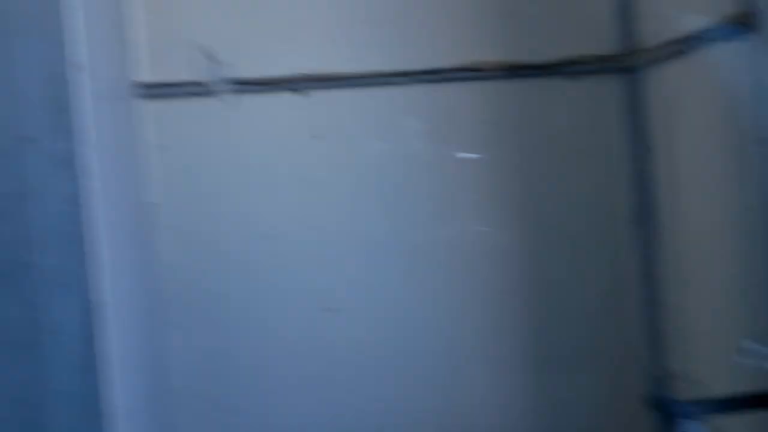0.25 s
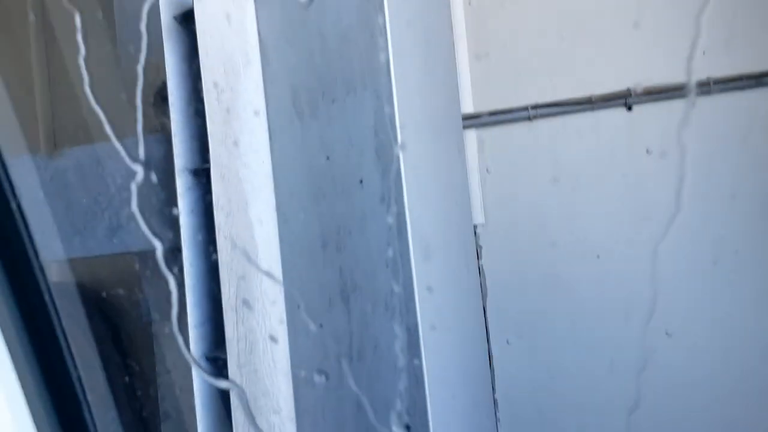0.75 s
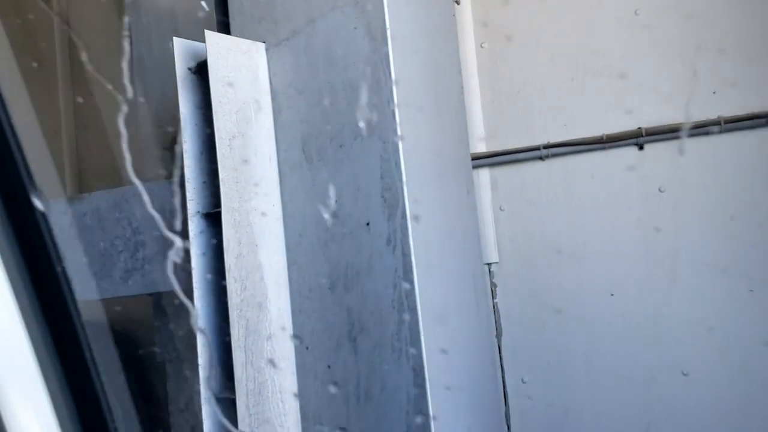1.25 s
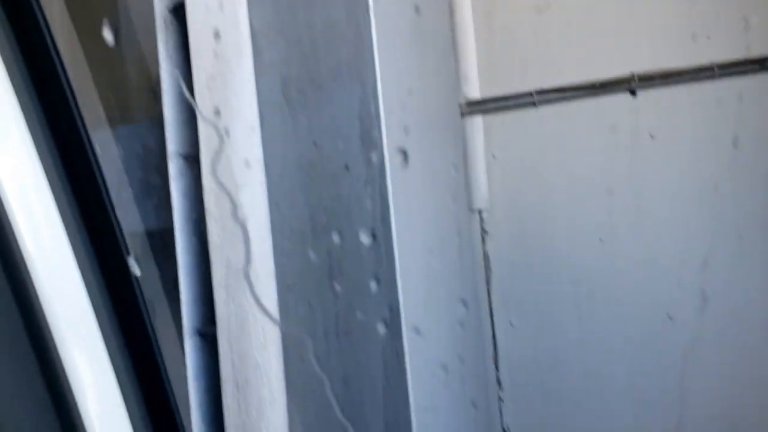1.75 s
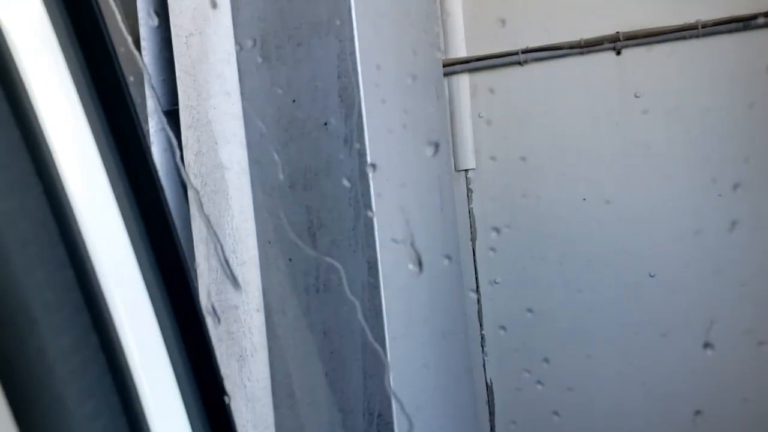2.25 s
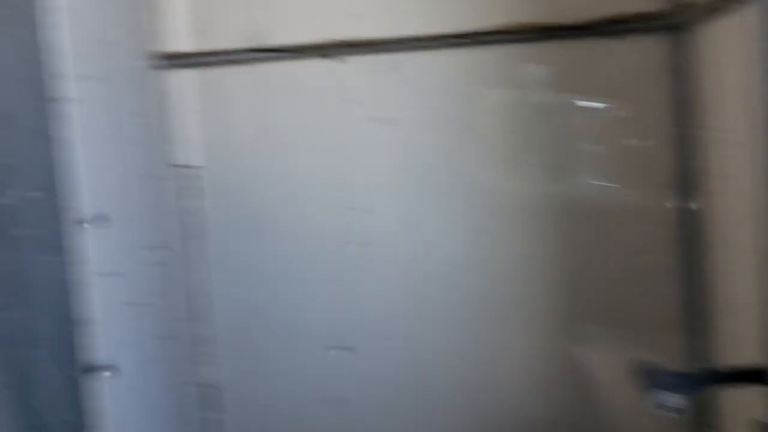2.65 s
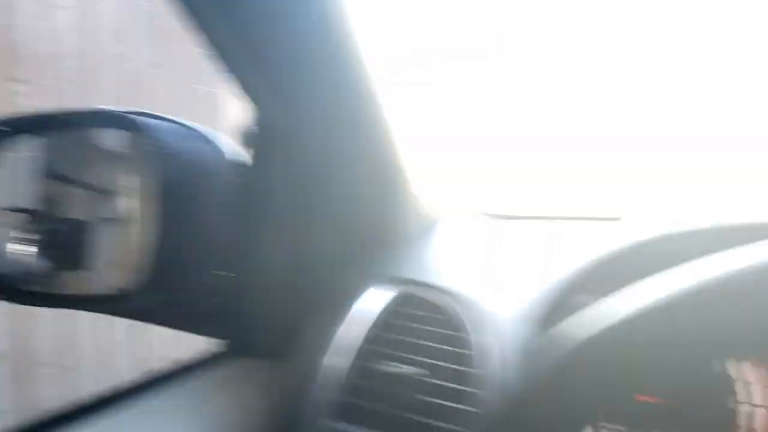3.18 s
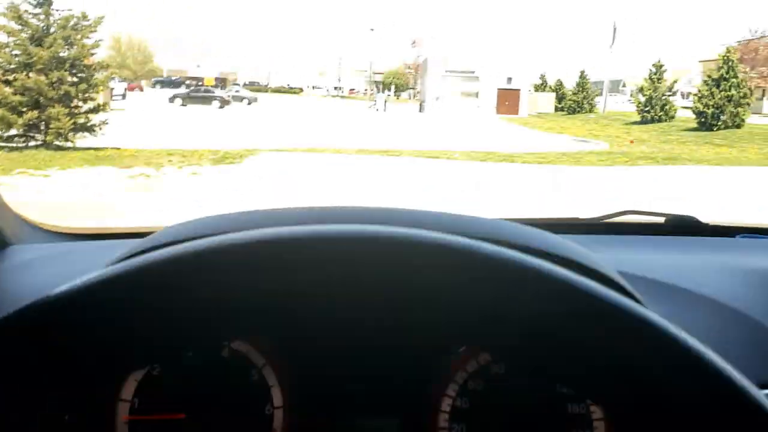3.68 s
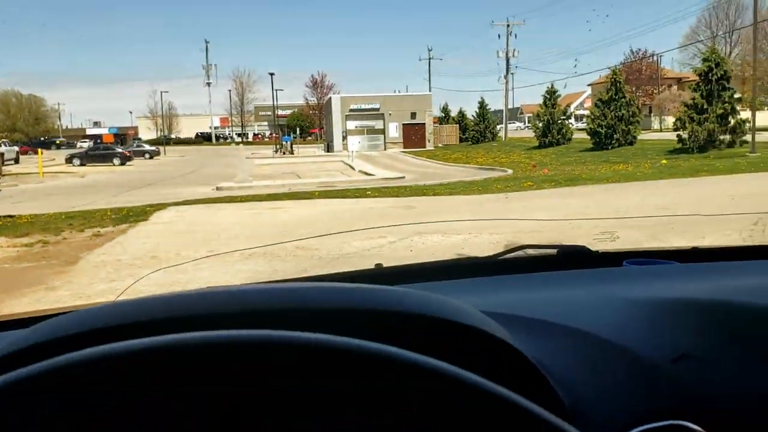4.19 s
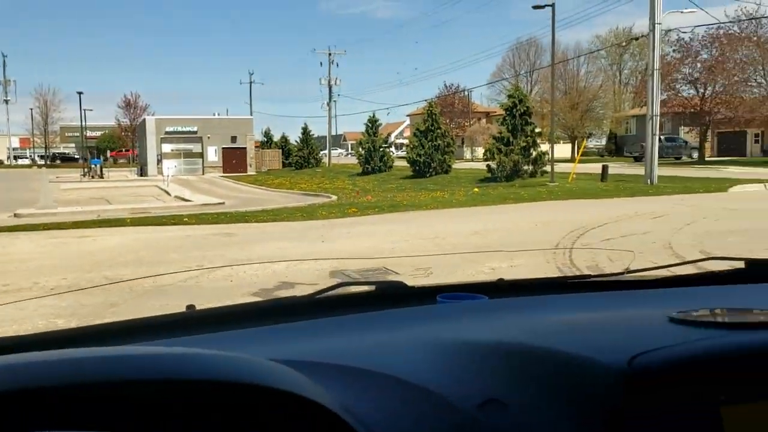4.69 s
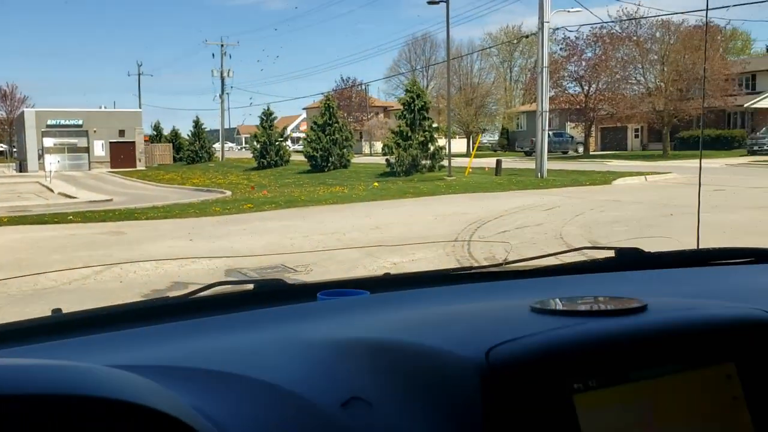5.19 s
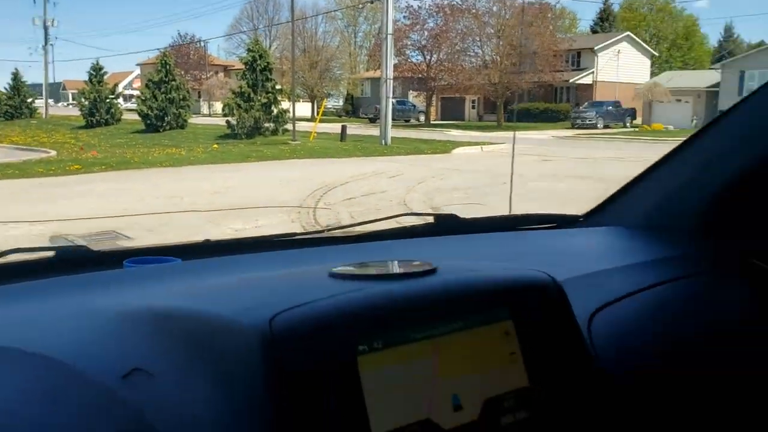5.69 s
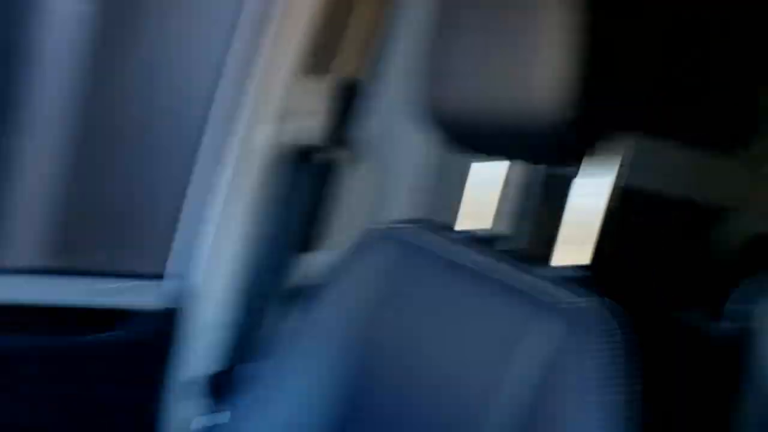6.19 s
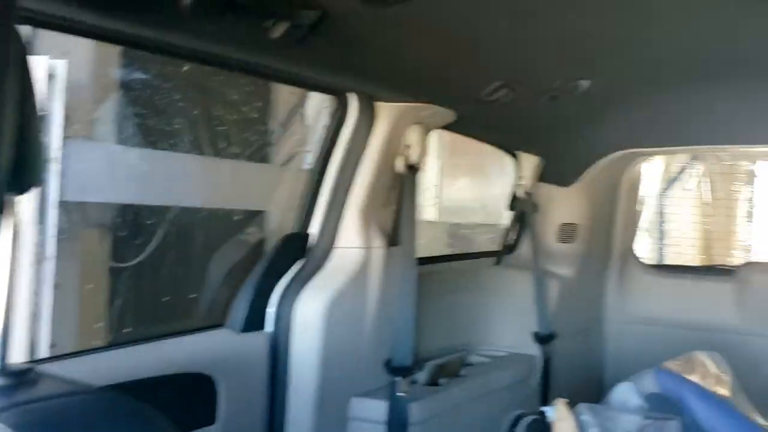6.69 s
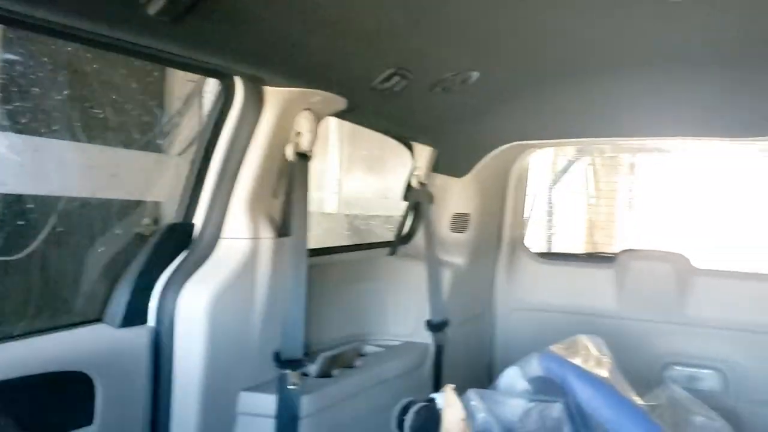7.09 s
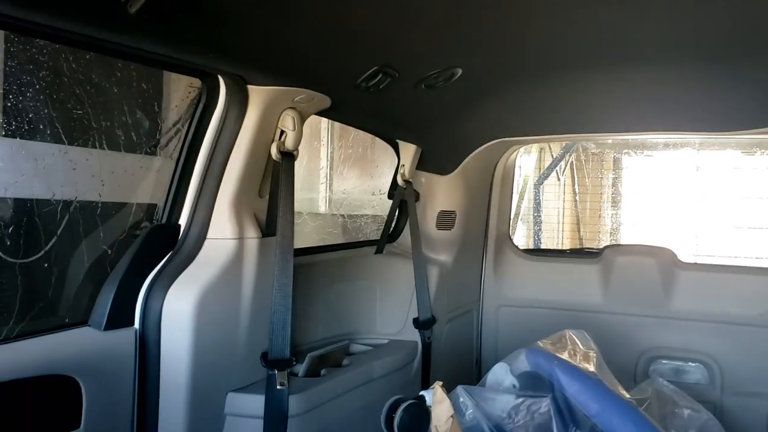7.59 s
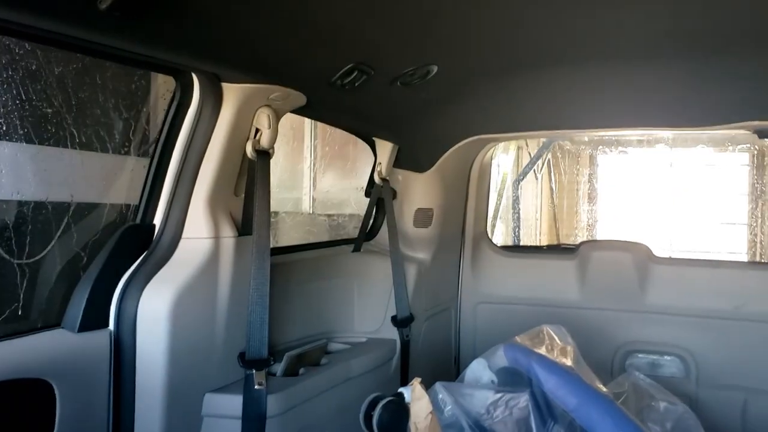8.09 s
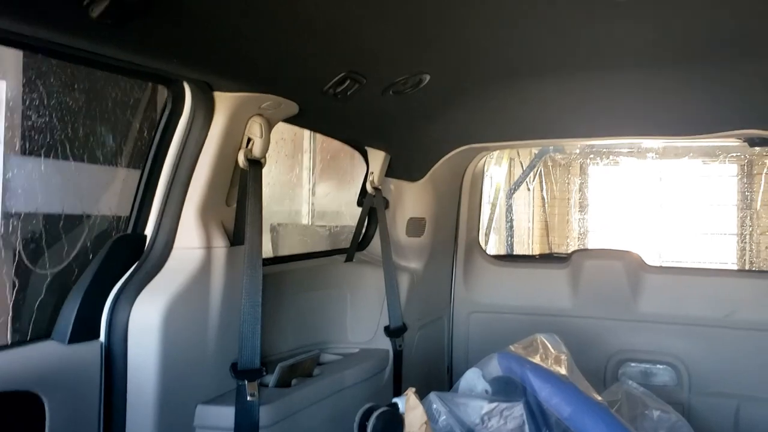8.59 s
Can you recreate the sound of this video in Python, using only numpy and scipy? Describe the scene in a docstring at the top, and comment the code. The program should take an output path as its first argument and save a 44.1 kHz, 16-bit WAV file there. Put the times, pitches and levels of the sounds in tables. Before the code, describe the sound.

Inside a van rolling slowly out of a car wash, large dryer blowers roar, dulled by the glass. A deep hum and boom fill the cabin, wavering and buffeting, with soft air hiss at the windows strongest early. Clothes rustle close to the handheld microphone as the person turns around three and six seconds, followed by faint ticks and crackles.

```python
"""Dryer blowers roar over a van rolling out of a car wash: filtered noise, muffled by the glass.
Their jets drum on shell, roof and doors: noise in steep resonances, following level curves and jet travel.
The cabin booms and hums (narrow noise, the hum around a wandering tone); air hisses at the windows.
The person holding the phone turns twice; clothes rustle, swish and crackle (shaped noise, tiny rings).
Noise-burst ticks and thin sine squeaks sound close by."""
import sys
import numpy as np
from scipy import signal
from scipy.fft import rfft, irfft, next_fast_len
from scipy.io import wavfile
from scipy.ndimage import uniform_filter1d, map_coordinates

SR = 44100
rng = np.random.default_rng(int(sys.argv[2]) if len(sys.argv) > 2 else 0)


def generate_wav(signal):
    """Clip the signal to [-1, 1] and save it as 16-bit WAV at the path in sys.argv[1]."""
    frames = np.transpose(np.atleast_2d(signal))
    scaled = np.clip(frames, -1, 1) * 32767
    pcm = np.round(scaled).astype(np.int16)
    wavfile.write(sys.argv[1], SR, pcm)


N = 390285


def amp(db):
    """Decibels to gain."""
    return 10 ** (np.asarray(db) / 20)


def unit(x):
    """Scale a stereo pair so that its mid signal has rms 1."""
    return x / np.sqrt(np.mean(x.mean(0) ** 2) + 1e-20)


def along(points, hz):
    """Interpolate (f/Hz, value) points on a log frequency axis."""
    f, v = np.transpose(points)
    return np.interp(np.log(hz + 1), np.log(f + 1), v)


def curves(rows):
    """One value per sample for each column after the time."""
    s, *cols = np.transpose(rows)
    return [np.interp(np.arange(N) / SR, s, c) for c in cols]


def wobble(rate_hz):
    """Smooth random curve with rate_hz knots a second."""
    knots = rng.standard_normal(int(N * rate_hz / SR) + 4)
    return map_coordinates(knots, [np.arange(N) * rate_hz / SR])


def ramp(start_s, length_s):
    """Linear rise from 0 to 1."""
    return np.clip((np.arange(N) / SR - start_s) / length_s, 0, 1)


def bump(middle_s, half_s):
    """Gaussian swell from 0 to 1 and back."""
    return np.exp(-((np.arange(N) / SR - middle_s) / half_s) ** 2)


def filtered(x, response):
    """Multiply the spectrum of x by response(hz)."""
    m = next_fast_len(N + SR // 2)
    return irfft(rfft(x, m) * response(np.fft.rfftfreq(m, 1 / SR)), m)[..., :N]


def panned(side_db):
    """Left and right gains of mean power 1 for a left-right level difference."""
    pair = amp(np.atleast_1d(side_db) * np.array([[1], [-1]]) / 2)
    return pair / np.sqrt(np.mean(pair ** 2, axis=0))


# left-right likeness before the lag: f/Hz, coherence
COHERENCE = [(40, 1), (170, 0.92), (350, 1), (480, 0.69), (620, .48), (850, .1), (1200, -.2), (2200, 0),
             (16000, -0.0024)]


def turbulence(colour, lag_s=0.00041):
    """Coloured noise, mid rms 1: ports alike in the bass, where the left leads by lag_s."""
    def mid_side_gains(hz):
        turn = np.arccos(np.clip(along(COHERENCE, hz), -1, 1)) / 2
        return np.array([np.cos(turn), np.sin(turn)])

    def lead(hz):
        lag = lag_s / (1 + (hz / 500) ** 2)
        return np.exp(1j * np.pi * hz * lag * np.array([[1], [-1]]))

    mid, side = filtered(rng.standard_normal((2, N)), mid_side_gains)
    ports = np.array([mid + side, mid - side])
    return unit(filtered(ports, lambda hz: colour(hz) * lead(hz)))


def drumming(modes, steady):
    """Noise through steep resonances; steady (0-1) evens out the power over 0.1 s."""
    def colour(hz):
        power = 0
        for centre_hz, width_hz, db in modes:
            detuning = (hz ** 2 - centre_hz ** 2) / (width_hz * (hz + 1))
            power = power + amp(db) ** 2 / (1 + detuning ** 2 / 2) ** 3
        return np.sqrt(power)

    x = turbulence(colour)
    power = np.abs(uniform_filter1d(x.mean(0) ** 2, size=SR // 10)) + 1e-6
    return unit(x / power ** (np.clip(steady, 0, 1) / 2))


def cored(hz, width_hz, core, steady):
    """Narrow resonance around a wandering tone that holds the share core (0-1) of its power."""
    tone = np.sqrt(2) * np.sin(2 * np.pi * np.cumsum(hz + width_hz / 4 * wobble(20)) / SR)
    return np.sqrt(1 - core) * drumming([(hz, width_hz, 0)], steady) + np.sqrt(core) * tone


TO_WINDSCREEN_S, QUICK_TURN_S = 3.12, 0.59  # turn from side window to windscreen: middle, length
TO_REAR_S, SLOW_TURN_S = 5.83, 1.1  # turn on to the rear seats: middle, length


def heading():
    """How far the phone faces the windscreen, and how far the rear seats (each 0-1)."""
    first = ramp(TO_WINDSCREEN_S - QUICK_TURN_S / 2, QUICK_TURN_S)
    second = ramp(TO_REAR_S - SLOW_TURN_S / 2, SLOW_TURN_S)
    return first - second, second


# base left-right level of the low sound, and its change in each direction
SIDE_DB, WINDSCREEN_SIDE_DB, REAR_SIDE_DB = 3, 1, -0.9


def facing_db():
    """Left-right level of the low sound as the phone turns."""
    to_windscreen, to_rear = heading()
    return SIDE_DB + WINDSCREEN_SIDE_DB * to_windscreen + REAR_SIDE_DB * to_rear


FADE_SHAPE = 1.3  # exponent above 1: the front jets linger before they fade
REAR_FULL_S = 8.5  # rear jets at full gain from here on


def driven(drive):
    """A part's gain as the jets travel front to rear and the phone moves through standing waves."""
    level_db, front_db, fade_s, rear_db, felt_s, windscreen_db = drive
    front_jets = np.exp(-(np.arange(N) / SR / fade_s) ** FADE_SHAPE)
    rear_jets = ramp(felt_s, REAR_FULL_S - felt_s)
    jets_db = front_db * front_jets + rear_db * rear_jets
    return amp(level_db + jets_db + windscreen_db * heading()[0])


BUFFET_DB = 1.3  # scale of the random swing of the jets' push


def buffeted(drive):
    """A driven gain with a random swing."""
    return driven(drive) * amp(BUFFET_DB * wobble(8))


def reflections(x, depth_db=1.0):
    """Window reflections: random, drifting ripples in the spectrum at each port."""
    z = signal.stft(x, nperseg=2048)[2]
    ripple = uniform_filter1d(rng.standard_normal(z.shape), size=3, axis=1)
    ripple = uniform_filter1d(ripple, size=36, axis=2)
    return signal.istft(z * amp(depth_db * ripple / ripple.std()), nperseg=2048)[1][:, :N]


# right port is weak in a band of the treble: f/Hz, left-right level/dB
PORT_SIDE = [(3000, 8), (5000, 10.5), (5800, 19.5), (7900, 19.5), (9300, -0.5), (11500, -2), (14500, 6)]


def close_by(x, spectrum):
    """Colour a sound made right beside the microphone ports."""
    return filtered(x, lambda hz: amp(along(spectrum, hz)) * panned(along(PORT_SIDE, hz)))


# body shell resonances: f/Hz, width/Hz, relative level/dB
SHELL_MODES = [(39, 22, -0.5), (53, 17, 0.5)]
# gusts on the shell: t/s, half length/s, gain/dB
GUSTS = [(0.35, 0.15, 3.5), (1.95, 0.27, 2.5), (4.75, 0.14, 7), (5.3, 0.31, 4), (6.348, 0.27, 5.5),
         (8.33, 0.18, 6.5)]
SHUDDER_DB = -33  # between gusts


def shudder():
    """Body shell: deep resonances, louder in gusts."""
    gust_db = sum(db * bump(s, half_s) for s, half_s, db in GUSTS)
    return amp(SHUDDER_DB + gust_db) * drumming(SHELL_MODES, steady=0.8) * panned(1.1)


# roof resonances: f/Hz, width/Hz, relative level/dB
ROOF_MODES = [(70.4, 36, -1.3), (95, 20, 2.8)]
# roof drumming: t/s, level/dB
ROOF_LEVEL = [(0.0, -24.5), (0.55, -21), (1.3, -24.5), (2.0, -24), (2.4, -26.5), (3.4, -27.5), (4.6, -26),
              (5.5, -31), (6.3, -29.5), (6.9, -28), (8.15, -27), (8.6, -22.5), (8.85, -23)]


def roof():
    """Roof panel: low resonances, uneven drumming."""
    [level_db] = curves(ROOF_LEVEL)
    return amp(level_db) * drumming(ROOF_MODES, steady=0.06) * panned(facing_db() - 1.5)


# cabin air resonance: f/Hz, width/Hz, relative level/dB
BOOM_MODES = [(126.5, 32, 0)]
# cabin boom before brief rises and dips: t/s, level/dB
BOOM_LEVEL = [(0.0, -24.5), (0.7, -22.5), (2.1, -22.5), (2.6, -22.5), (3.1, -18.5), (3.6, -21),
              (4.7, -22.5), (5.2, -21), (5.52, -23.5), (6.1, -25), (6.7, -23.5), (7.2, -22), (7.5, -29.5),
              (7.85, -21), (8.12, -32), (8.5, -22), (8.85, -20.5)]


def boom():
    """Cabin air: one resonance below the hum."""
    [level_db] = curves(BOOM_LEVEL)
    return amp(level_db) * drumming(BOOM_MODES, steady=0.21) * panned(facing_db() - 0.3)


# cabin hum before brief rises and dips: t/s, level/dB, f/Hz
HUM = [(0.0, -19, 156.5), (0.8, -21.5, 155), (1.1, -22, 151.8), (1.58, -27.5, 149.6), (1.76, -18, 151.7),
       (2.2, -17.5, 153), (2.6, -20, 153.2), (3.0, -20.5, 163.8), (3.35, -22, 161.4), (3.68, -18.5, 156.6),
       (4.0, -29.5, 154.8), (4.4, -19, 151.1), (4.8, -19.5, 152.8), (5.1, -24, 155.4), (5.5, -18.5, 150.8),
       (6.25, -27.5, 148.2), (7.2, -25, 149.7), (8.1, -33, 156.8), (8.85, -36, 159.5)]
HUM_WIDTH_HZ, HUM_CORE = 25.5, 0.33  # width at mean pitch; tone's share of the power


def hum():
    """Main cabin resonance: a firm, narrow band, resampled so that its pitch drifts."""
    level_db, hz = curves(HUM)
    ring = cored(hz.mean(), HUM_WIDTH_HZ, HUM_CORE, steady=1.0)
    read_at = np.cumsum(hz / hz.mean())
    drifting = np.array([np.interp(read_at, np.arange(N), port) for port in ring])
    return amp(level_db) * drifting * panned(facing_db() + 0.43)


# front panel resonance: f/Hz, width/Hz, relative level/dB
FRONT_MODES = [(197.9, 44, 0.5)]
# drive: level/dB, front-jet gain/dB, its fade/s, rear-jet gain/dB, felt from t/s, windscreen gain/dB
FRONT_DRIVE = (-34.5, 8.5, 5.5, 0, 5.5, -6)


def front_panel():
    """Front panel: one resonance, buffeted by the jets."""
    return buffeted(FRONT_DRIVE) * drumming(FRONT_MODES, steady=0.28) * panned(facing_db() + 3.0)


# rear resonances: f/Hz, width/Hz, relative level/dB
REAR_MODES = [(185, 42, -0.85), (231.6, 54, -0.71)]
# drive: level/dB, front-jet gain/dB, its fade/s, rear-jet gain/dB, felt from t/s, windscreen gain/dB
REAR_DRIVE = (-30.5, 4.5, 2, 6, 5, -2)


def rear():
    """Rear of the van: two resonances, buffeted by the jets."""
    return buffeted(REAR_DRIVE) * drumming(REAR_MODES, steady=0.61) * panned(facing_db() + 0.4)


# door resonances: f/Hz, width/Hz, relative level/dB
DOOR_MODES = [(284, 73, -5), (312.4, 58, 0.5), (375.4, 46, -4.5)]
# door drumming before its random swing: t/s, level/dB
DOORS_LEVEL = [(0.0, -32.5), (0.45, -26.5), (0.9, -32), (1.5, -30.5), (2.9, -34.5), (3.6, -32),
               (5.0, -29.5), (5.8, -32), (6.9, -29.5), (7.95, -30), (8.85, -30.5)]


def doors():
    """Doors: three resonances with a small random swing."""
    [level_db] = curves(DOORS_LEVEL)
    gain = amp(level_db + 0.79 * wobble(9.1))
    return gain * drumming(DOOR_MODES, steady=0.13) * panned(facing_db() + 1.3)


# drone: t/s, level/dB
DRONE_LEVEL = [(0.0, -30.5), (0.5, -43), (1.05, -40), (1.45, -33), (2.0, -33.5), (2.5, -38), (3.1, -33.5),
               (3.5, -35.5), (4.0, -29), (4.7, -35), (5.2, -32.5), (5.8, -39.5), (6.5, -35), (7.6, -40.5),
               (8.2, -36), (8.85, -33.5)]
DRONE_HZ, DRONE_WIDTH_HZ, DRONE_CORE = 349, 24, 0.2  # core: tone's share of the power


def drone():
    """Second narrow resonance, above the hum."""
    [level_db] = curves(DRONE_LEVEL)
    ring = cored(DRONE_HZ, DRONE_WIDTH_HZ, DRONE_CORE, steady=0.3)
    return amp(level_db) * ring * panned(facing_db() + 3.5)


# tailgate resonance: f/Hz, width/Hz, relative level/dB
TAILGATE_MODES = [(425, 60, 0)]
TAILGATE_DB, TAILGATE_S, TAILGATE_HALF_S = -40.5, 7.15, 1.05  # peak level, middle, half length


def tailgate():
    """Tailgate: one resonance that swells as the jets sweep over it."""
    swell = amp(TAILGATE_DB) * bump(TAILGATE_S, TAILGATE_HALF_S)
    return swell * drumming(TAILGATE_MODES, steady=0.2) * panned(facing_db() - 1.0)


# brief random rises and dips in the loudness of boom and hum: t/s, half length/s, gain/dB
RISES_AND_DIPS = [(0.85, 0.04, 5), (1.525, 0.053, 4), (1.734, 0.025, 5), (2.623, 0.03, 4),
                  (2.995, 0.056, 3), (3.12, 0.029, -7), (5.295, 0.068, -4.5), (5.43, 0.04, 3.5),
                  (5.54, 0.027, 5), (5.68, 0.04, 0.5)]


def body():
    """Panels and cabin air under the jets; boom and hum rise and dip together."""
    swing_db = sum(db * bump(s, half_s) for s, half_s, db in RISES_AND_DIPS)
    air = amp(swing_db) * (boom() + hum())
    return shudder() + roof() + air + front_panel() + rear() + doors() + drone() + tailgate()


# standing-wave dip: t/s, f/Hz, gain/dB
NULL = [(0, 266, -10), (1.0, 254, -3), (2.9, 259, -6), (3.35, 231, -11.5), (3.8, 222.5, -6),
        (4.9, 213, -2.5), (5.6, 216, -7), (6.3, 187, -6.5), (6.6, 186, -3.5)]
NULL_WIDTH_HZ = 22  # Gaussian half width


def standing_wave(x):
    """Standing wave: a narrow band is weakened and slides as the phone moves."""
    hz, t, z = signal.stft(x, SR, nperseg=4096, noverlap=3072)
    s, null_hz, null_db = np.transpose(NULL)
    offset_hz = hz[:, None] - np.interp(t, s, null_hz)
    dip_db = np.interp(t, s, null_db) * np.exp(-(offset_hz / NULL_WIDTH_HZ) ** 2)
    return signal.istft(z * amp(dip_db), SR, nperseg=4096, noverlap=3072)[1][:, :N]


# airflow side: f/Hz, left-right level/dB
AIR_SIDE = [(300, 7), (650, 4.5), (1000, 7.5), (2000, 8), (2600, 10.5), (5000, 11.5), (5700, 20.5),
            (7900, 23.5), (9300, 4), (15000, 6)]


def stream(spectrum):
    """Airflow: turbulence of a given spectrum, stronger on the left."""
    return turbulence(lambda hz: amp(along(spectrum, hz)) * panned(along(AIR_SIDE, hz)))


# blower roar: f/Hz, relative level/dB
ROAR = [(150, -18.5), (300, -2), (440, -0.5), (550, -4), (680, -10.5), (800, -11.5), (1000, -18.5),
        (1500, -36.5), (4000, -80.5)]
# drive: level/dB, front-jet gain/dB, its fade/s, rear-jet gain/dB, felt from t/s, windscreen gain/dB
ROAR_DRIVE = (-40, 4.5, 1.5, 3.5, 5, 1.6)


def roar():
    """Blower roar: low-mid turbulence, dull through the glass."""
    return driven(ROAR_DRIVE) * amp(0.83 * wobble(6.9)) * stream(ROAR)


# blower rush: f/Hz, relative level/dB
RUSH = [(500, -16.5), (850, -4.5), (1100, 5), (1300, 2.5), (1550, 0), (1950, -3), (2300, -6), (3000, -19.5),
        (4000, -20.5), (8000, -59.5)]
# drive: level/dB, front-jet gain/dB, its fade/s, rear-jet gain/dB, felt from t/s, windscreen gain/dB
RUSH_DRIVE = (-57, 6.5, 3, 2.5, 7.0, 0.2)


def rush():
    """Blower rush: turbulence mostly between 1 and 2 kHz."""
    return driven(RUSH_DRIVE) * amp(0.46 * wobble(13)) * stream(RUSH)


# window hiss: f/Hz, relative level/dB
HISS = [(1200, -26), (2000, -2), (2650, 2), (3300, -2), (3800, -5.5), (4300, -7), (5200, -14),
        (6300, -19.5), (7600, -22), (8700, -29), (15000, -40)]
# drive: level/dB, front-jet gain/dB, its fade/s, rear-jet gain/dB, felt from t/s, windscreen gain/dB
HISS_DRIVE = (-59.5, 8, 2.5, 1.6, 8, 0.5)


def hiss():
    """Air past the window seals: high turbulence with a fast flutter."""
    return driven(HISS_DRIVE) * amp(0.63 * wobble(16)) * stream(HISS)


# jet on the side window's seal: f/Hz, relative level/dB
SEAL = [(1500, -18.5), (3000, -3), (4200, 2.5), (5500, -8), (7500, -13), (9000, -20), (15000, -27)]
SEAL_DB, SEAL_S, SEAL_HALF_S = -63.5, 0.22, 0.65  # peak level, middle, half length


def seal():
    """Side window seal: one swell of turbulence under a jet."""
    return amp(SEAL_DB) * bump(SEAL_S, SEAL_HALF_S) * stream(SEAL)


# hump in the front nozzles' hiss: f/Hz, width/Hz, relative level/dB
NOZZLE_MODES = [(3100, 840, 0)]
NOZZLE_DB, NOZZLE_S, NOZZLE_HALF_S = -64.5, 1.2, 2.6  # peak level, middle, half length


def nozzle():
    """Front nozzles: a broad hump of hiss that swells and fades."""
    return amp(NOZZLE_DB) * bump(NOZZLE_S, NOZZLE_HALF_S) * drumming(NOZZLE_MODES, steady=0) * panned(9)


# windscreen ring: f/Hz, width/Hz, relative level/dB
WINDSCREEN_MODES = [(1190, 230, 0)]
WINDSCREEN_DB, WINDSCREEN_S, WINDSCREEN_HALF_S = -60, 4.3, 1.05  # peak level, middle, half length


def windscreen():
    """Windscreen: a resonance that swells around the time the phone faces it."""
    swell = amp(WINDSCREEN_DB) * bump(WINDSCREEN_S, WINDSCREEN_HALF_S)
    return swell * drumming(WINDSCREEN_MODES, steady=0) * panned(4.6)


def airflow():
    """Blowers and window air; all but roar and windscreen ripple with reflections."""
    return roar() + windscreen() + reflections(rush() + hiss() + seal() + nozzle())


WHINE_HZ, WHINE_DB = 1736, -72  # centre values of the waver and flutter


def whine(waver=0.0015, flutter_db=2):
    """Blower tone: one faint, slightly unsteady sine."""
    phase = 2 * np.pi * WHINE_HZ * np.cumsum(1 + waver * wobble(25)) / SR
    return amp(WHINE_DB + flutter_db * wobble(3.6)) * np.sin(phase) * panned(along(AIR_SIDE, WHINE_HZ))


# strokes of clothes on the seat: start t/s, length/s, relative level/dB, left-right level/dB
STROKES = [(-0.1, 0.62, -70.5, 2.5), (0.551, 0.91, -81, 3), (2.569, 0.13, -73.5, -0.5),
           (2.7, 0.14, -68.5, 2), (2.892, 0.17, -63.5, 4), (3.078, 0.1, -69.5, 4.5), (3.2, 0.12, -73, 4.5),
           (3.351, 0.3, -77, 5), (4.239, 0.05, -73, 3.5), (4.452, 0.25, -75.5, -0.5),
           (4.898, 0.5, -76.5, -0.5), (5.046, 0.12, -74.5, 1), (5.695, 0.23, -73.5, -1),
           (5.883, 0.22, -71, -3.5), (6.091, 0.25, -62.5, -8.5), (6.357, 0.15, -69.5, -8),
           (6.603, 0.82, -80, -3), (7.552, 0.23, -77, 0.5), (8.022, 0.08, -68.5, -8),
           (8.148, 0.28, -72, -4), (8.401, 0.21, -66, -9), (8.729, 0.12, -69.5, -5.5)]
FIDGET_DB = -79  # faint rustle between strokes, relative like the strokes
STROKE_ATTACK_S, STROKE_RELEASE_S = 0.053, 0.115  # time constants


def sliding():
    """Left and right rustle gain: each stroke builds, holds and dies away."""
    t = np.arange(N) / SR
    power = amp(FIDGET_DB) ** 2
    for start, length, db, side_db in STROKES:
        attack = (1 + np.tanh((t - start) / STROKE_ATTACK_S - .5)) / 2
        release = np.exp(-np.maximum(t - start - length, 0) / STROKE_RELEASE_S)
        power = power + (amp(db) * attack * release * panned(side_db)) ** 2
    return np.sqrt(power)


# cloth fizz: f/Hz, relative level/dB
CLOTH = [(1500, -15.5), (4000, 1.5), (6000, -2), (7800, -2.5), (8700, -8), (9700, 1), (12000, -0.5),
         (13300, -3.5), (15800, -3)]


def clothes(fizz_db=5.2, brighten=.33, catch_db=1.0):
    """Sliding fabric: fine noise that catches and slips, brighter in stronger strokes."""
    gain = sliding()
    fibres = rng.standard_normal((2, N)) * amp(1.2 * wobble(400) + catch_db * wobble(28))
    fizz = unit(reflections(close_by(fibres, CLOTH)))
    top = filtered(fizz, lambda hz: np.clip((hz - 12000) / 1000, 0, 1))
    brighter = (gain[0] / gain[0].mean()) ** brighten
    return amp(fizz_db) * gain * (fizz + (brighter - 1) * top)


# rubbing squeaks: t/s, length/s, f/Hz, level/dB before panning and grip
SQUEAKS = [(.82, .08, 12450, -78), (.97, .045, 7320, -70), (1.03, .11, 7400, -79), (1.134, .08, 12500, -80),
           (1.342, .1, 12450, -77), (1.39, .045, 9600, -77), (1.47, .06, 9600, -81),
           (2.723, 0.115, 9530, -62), (2.73, .08, 7750, -72), (2.774, .09, 15400, -71)]


def squeaks(waver=.018):
    """Rubbing: brief, very high sines, unsteady in pitch and level."""
    t, out = np.arange(N) / SR, np.zeros(N)
    bend, grip = 1 + waver * wobble(900), amp(3 * wobble(90))
    for s, length, hz, db in SQUEAKS:
        swell = np.sqrt(np.abs(np.sin(np.pi * np.clip((t - s) / length, 0, 1))))
        out += amp(db) * swell * grip * np.sin(2 * np.pi * hz * np.cumsum(bend) / SR)
    return out * panned(6)


# small ticks: t/s, relative level/dB, left-right level before port colour/dB, f/Hz, half width/octaves, t60/s
TICKS = [(1.6033, -50, 3, 8840, .22, .05), (2.708, -54, 1, 9800, .4, .04),
         (3.455, -55.5, 3, 9500, .6, .045), (4.262, -61, 2.5, 13000, .5, .12),
         (4.531, -55, 1, 10900, .4, .03), (4.591, -54.5, -1.5, 8700, .7, .05),
         (5.678, -57.5, 1.5, 11460, .4, .04), (5.7439, -55.5, 5, 10100, .7, .06),
         (6.4904, -51, -10, 10900, .13, .015), (6.6004, -53.5, -5, 10500, .15, .015),
         (6.6462, -54.5, 3, 13400, .35, .045), (6.713, -51.5, -5.5, 11070, .13, .015),
         (6.751, -47.5, 3.5, 13000, .9, .04), (6.979, -56.5, 4, 11030, .7, .05),
         (7.1481, -56.5, -6.5, 10800, .15, .015), (7.2317, -57, -4.5, 10360, .15, .015),
         (7.315, -56.5, 3.5, 13700, .5, .05), (7.4167, -54, 0.5, 10460, .6, .045),
         (7.6136, -48, -2.5, 10880, .45, .025), (7.62, -55.5, -0.5, 11540, .6, .05),
         (7.721, -50.5, -10.5, 10970, .12, .013), (7.7622, -56, -1, 11000, .45, .06),
         (8.0798, -52.5, -6, 10720, .15, .015), (8.152, -48, -10.5, 11240, .12, .013),
         (8.169, -45.5, -5.5, 11200, .2, .018), (8.1979, -53.5, -5.5, 10500, .15, .013),
         (8.2418, -51, 3.5, 8480, .9, .05), (8.2517, -50.5, 4, 9000, .9, .07),
         (8.325, -51.5, -6.5, 11340, .13, .013), (8.3456, -53.5, 1, 10900, .5, .04),
         (8.5644, -45.5, -9.5, 10960, .13, .015), (8.754, -53, -10, 11000, .13, .015),
         (8.8113, -49.5, -6, 11500, .15, .013)]
# colour shared by all ticks: f/Hz, relative level/dB
TICK_TONE = [(1000, -27.5), (4000, -2.5), (7500, 0), (8700, -5), (10500, -2.5), (15800, -2.5)]


def ticks(tail_t60_s=.09, tail_db=-19):
    """Ticks: tiny band-noise cracks, each with a weaker tail as the cabin's answer."""
    out, t = np.zeros((2, N + SR)), np.arange(SR // 10) / SR
    hz = np.fft.rfftfreq(len(t), 1 / SR) + 1
    for s, db, side_db, centre_hz, octaves, t60_s in TICKS:
        decay = amp(-60 * t / t60_s) + amp(tail_db - 60 * t / tail_t60_s)
        fade = decay * (1 - np.exp(-t / .0004))
        colour = 1 / (1 + (np.log2(hz / centre_hz) / octaves) ** 2)
        crack = unit(irfft(rfft(rng.standard_normal((2, len(t)))) * colour, len(t)))
        out[:, round(s * SR):][:, :len(t)] += amp(db - 4.5) * panned(side_db) * fade * crack
    return close_by(out[:, :N], TICK_TONE)


# sleeve swishes: t/s, half length/s, level/dB before unevenness, f/Hz, width/octaves
SWISHES = [(3.05, .38, -60.5, 1770, .17), (3.0, .14, -64.5, 3900, .2), (6.8, .1, -71, 5100, .4)]


def sleeve(uneven_db=2.0, side_db=8):
    """Swinging sleeve: uneven band-noise swishes, duller than the fizz."""
    out = np.zeros((2, N))
    for s, half_s, db, centre_hz, octaves in SWISHES:
        colour = lambda hz: np.exp(-(np.log2((hz + 1) / centre_hz) / octaves) ** 2 / 2)
        band = filtered(rng.standard_normal((2, N)), colour)
        out += amp(db + uneven_db * wobble(25)) * bump(s, half_s) * unit(band)
    return out * panned(side_db)


CRACKLE_FROM_S, CRACKLES_PER_S = 6.3, 90
CRACKLE_DB, CRACKLE_HZ = 3, 10900  # gain on the sliding gain; centre of the pitch spread


def crackle(spread_db=6.0, octaves=.11, t60_s=.009):
    """Threads letting go: random tiny rings of differing pitch, following the sliding gain."""
    t = np.arange(SR // 50) / SR
    span_s = N / SR - CRACKLE_FROM_S
    draws = rng.random((int(CRACKLES_PER_S * span_s), 4))
    when, size, pitch, phase = draws.T[:, :, None]
    at = ((CRACKLE_FROM_S + when * span_s) * SR).astype(int) + np.arange(len(t))
    hz = CRACKLE_HZ * 2 ** (octaves * (2 * pitch - 1))
    fade = amp(spread_db * (2 * size ** 2 + 0.5) - 60 * t / t60_s)

    def grain(lag_cycles):
        jitter = np.cumsum(.25 * rng.standard_normal(at.shape), axis=1)
        return fade * np.sin(2 * np.pi * (hz * t + lag_cycles) + jitter)

    pair = np.array([np.bincount(at.ravel(), grain(lag).ravel(), N)[:N] for lag in (0, phase)])
    return amp(CRACKLE_DB) * sliding() * pair


def scene():
    """Sum of all sources; the standing wave acts on the body sound only."""
    outside = standing_wave(body()) + airflow() + whine()
    return outside + clothes() + squeaks() + ticks() + sleeve() + crackle()


LOW_CUT_HZ, TOP_HZ = 29, 15800


def record(dry):
    """The phone: steep bass cut, nothing from TOP_HZ up."""
    return filtered(dry, lambda hz: (hz < TOP_HZ) / np.sqrt(1 + (LOW_CUT_HZ / (hz + 1)) ** 8))


dry = scene()
out = record(dry)
generate_wav(out)
```